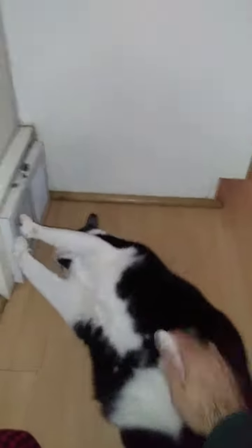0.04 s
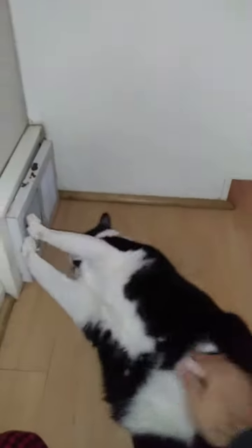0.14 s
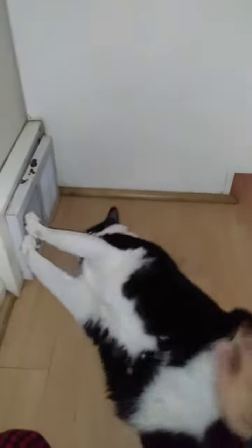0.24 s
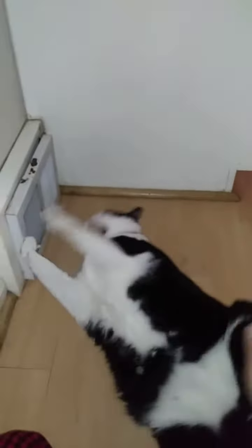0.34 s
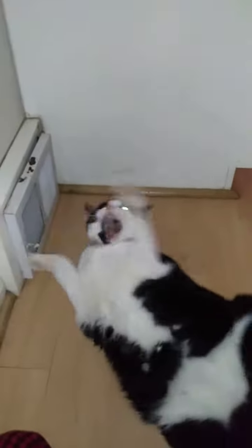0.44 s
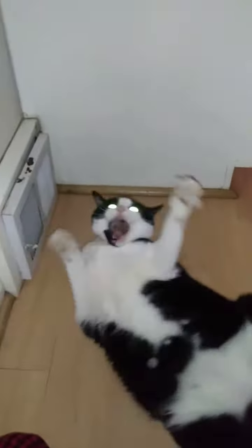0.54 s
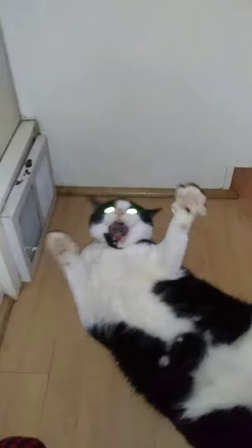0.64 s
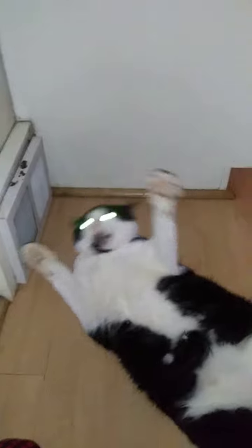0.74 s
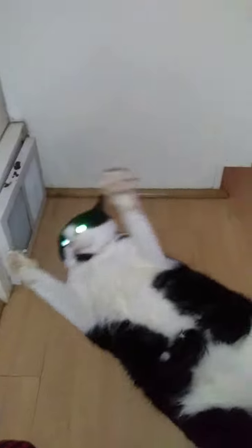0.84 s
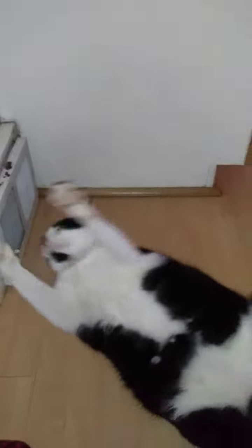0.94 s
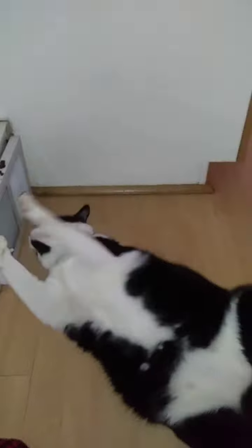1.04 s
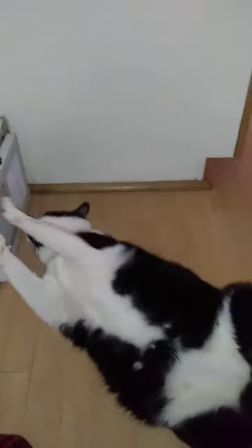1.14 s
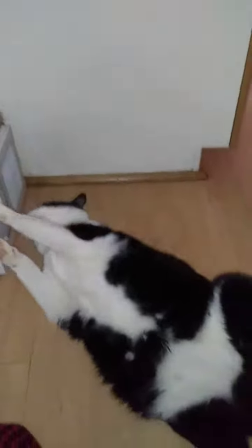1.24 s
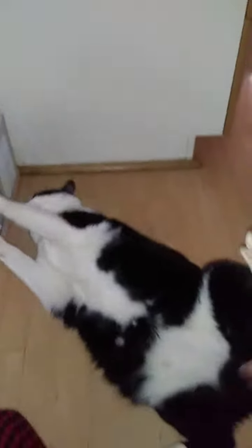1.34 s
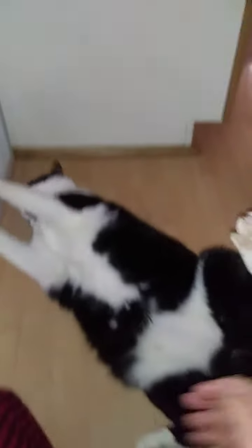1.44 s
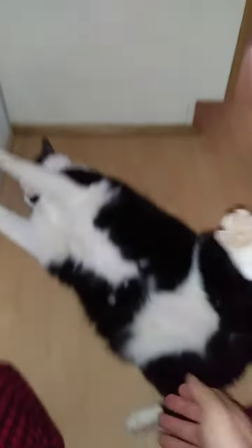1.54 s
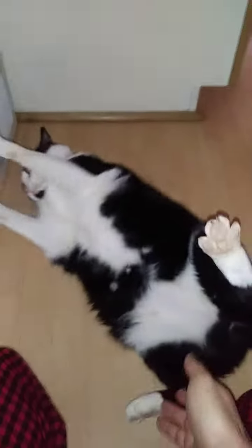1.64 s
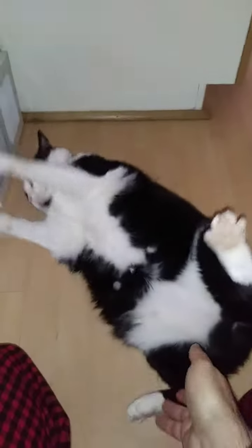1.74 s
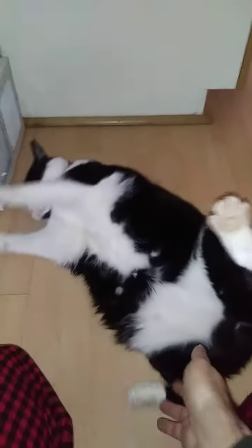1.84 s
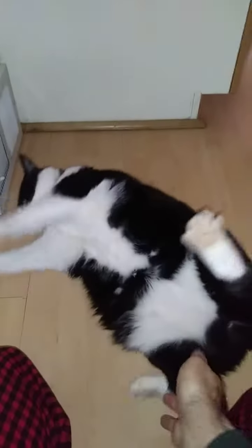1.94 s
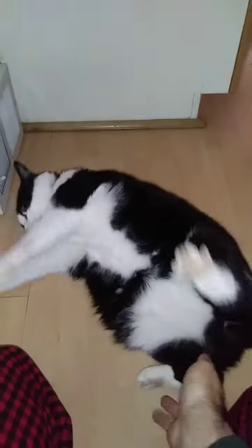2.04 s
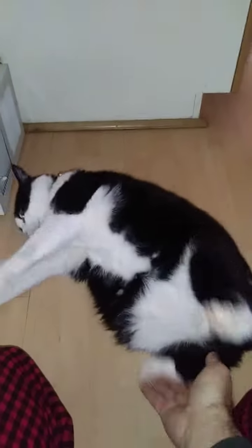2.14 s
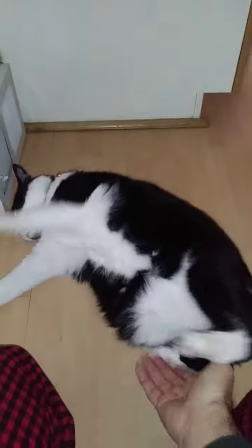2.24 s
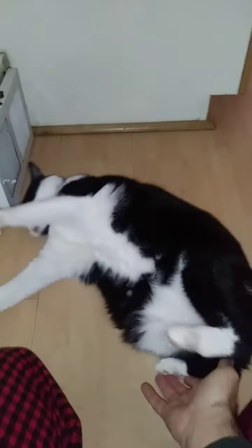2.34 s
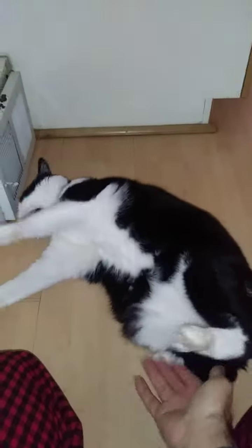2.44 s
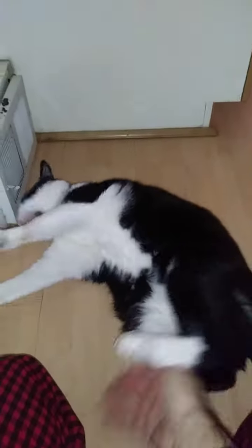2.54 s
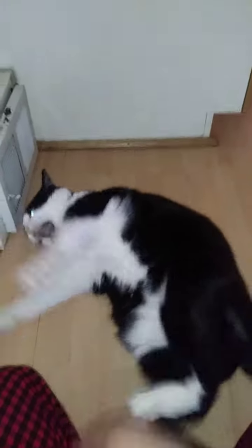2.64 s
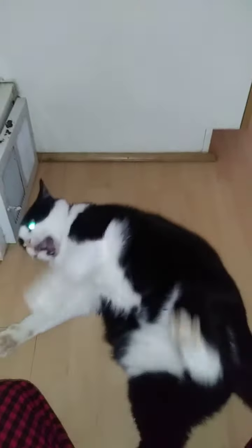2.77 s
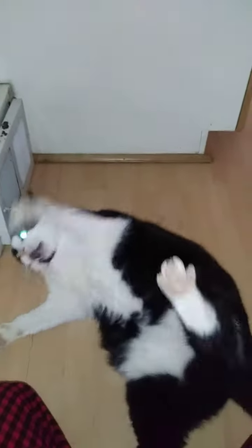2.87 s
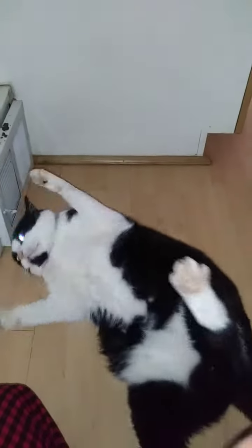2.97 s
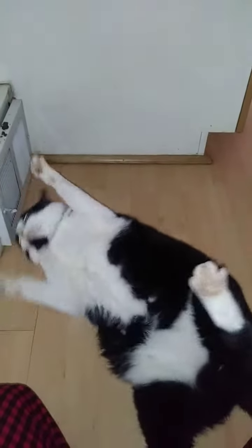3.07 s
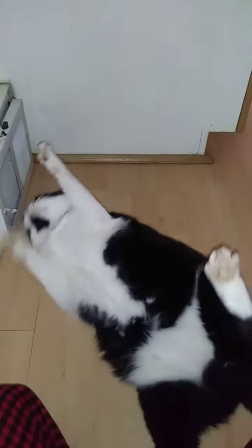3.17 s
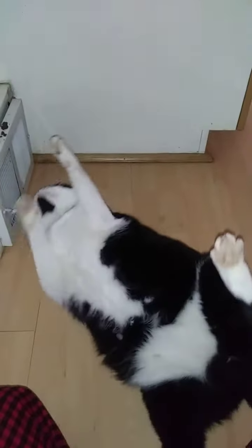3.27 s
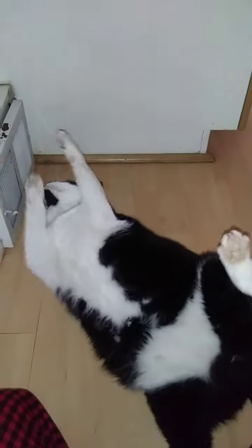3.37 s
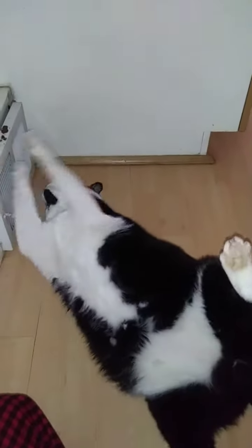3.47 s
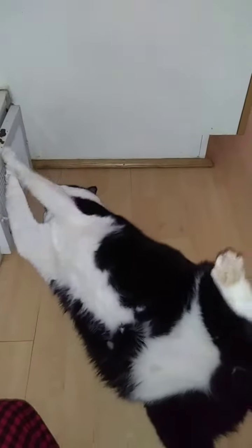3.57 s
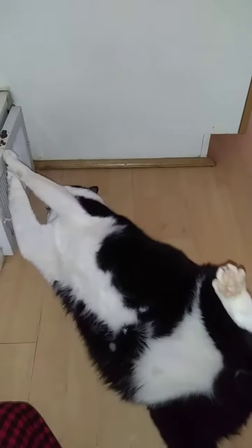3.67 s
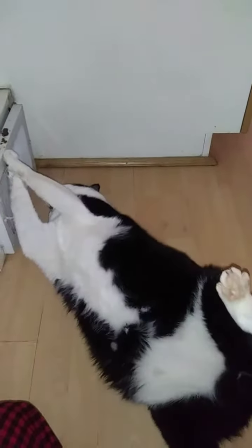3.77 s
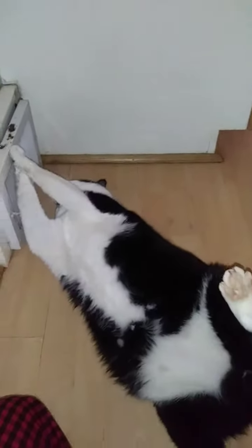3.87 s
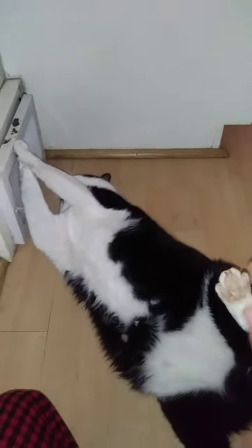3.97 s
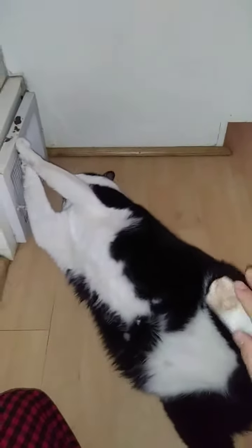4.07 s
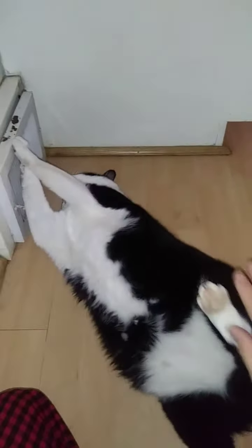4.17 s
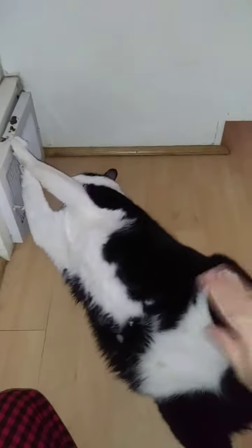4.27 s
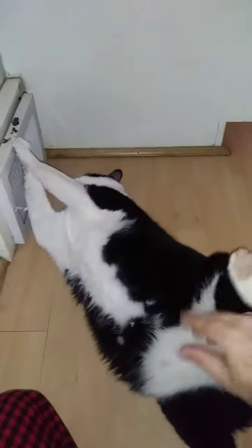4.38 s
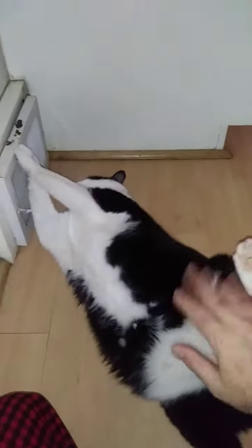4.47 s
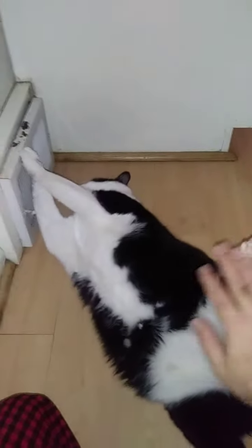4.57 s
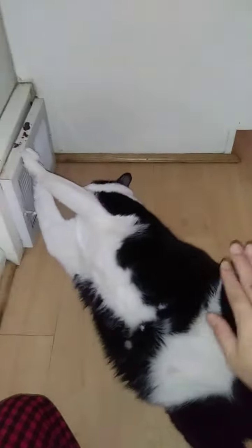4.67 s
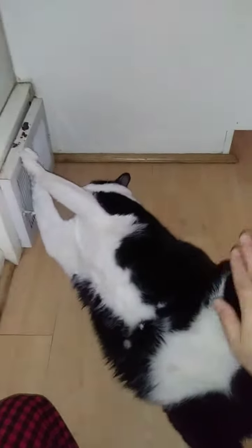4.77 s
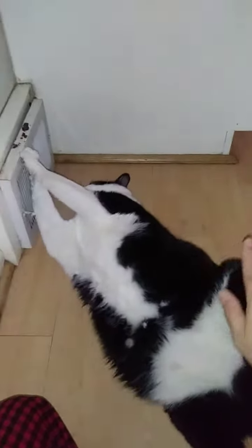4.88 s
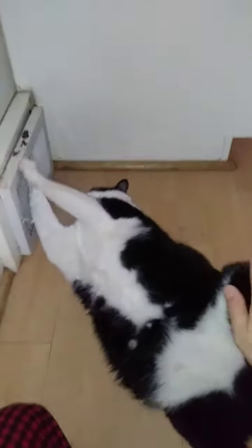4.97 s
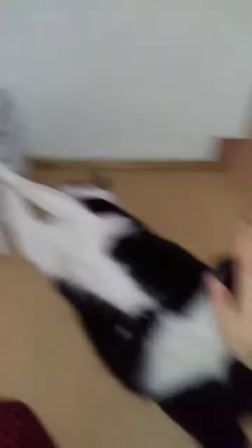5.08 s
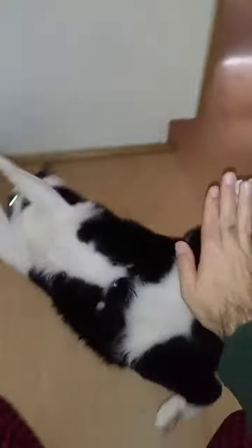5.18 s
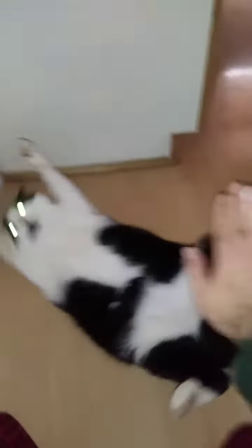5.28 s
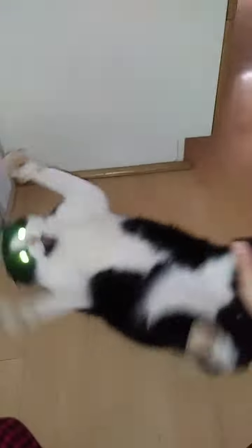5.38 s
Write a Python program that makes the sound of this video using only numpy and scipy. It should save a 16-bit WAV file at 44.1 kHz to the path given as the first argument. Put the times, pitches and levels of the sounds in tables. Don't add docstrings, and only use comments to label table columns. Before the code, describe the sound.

Close indoor cat meows, first raspy then clear, the second led in by a trill, amid small ticks, fur rustle and steady low hum.

```python
import sys
import numpy as np
from scipy import signal
from scipy.io import wavfile
from scipy.ndimage import uniform_filter1d

SR = 44100
rng = np.random.default_rng(int(sys.argv[2]) if len(sys.argv) > 2 else 0)


def voltage_ratio(level):
    return 10 ** (np.asarray(level, float) / 20)


def generate_wav(signal):
    frames = np.transpose(np.atleast_2d(signal))
    scaled = np.clip(frames, -1, 1) * 32767
    pcm = np.round(scaled).astype(np.int16)
    wavfile.write(sys.argv[1], SR, pcm)


N = 238713


def cat_calls(near):
    # t/s, effort/dB, jaw opening [0-1], lips drawn back [0-1]
    first = [(0.269, -54, 0.66, 0.53), (0.318, -34.5, 0.37, 0.36), (.34, -35.5, .45, .85),
             (.44, -35, 0.73, 0.75), (.51, -36.5, 0.78, 0.63), (.588, -28.5, 0.43, 0.3),
             (.624, -23, 0.33, 0.07), (0.741, -25.5, 0, 1), (0.787, -63, 0.83, 0.3)]
    trill = [(2.17, -79, 0.88, 0.19), (2.27, -76, 0.52, .4), (2.346, -55, 0.12, .6),
             (2.396, -34.5, 0.2, 0.58)]
    second = [(2.434, -32, 0.56, 0.63), (2.51, -40, 0.78, 0.88), (2.54, -32, 0.73, 0.93),
              (2.606, -39, 0.84, 0.71), (2.658, -30.5, 0.75, 0.79), (2.732, -29, 0.53, 0.76),
              (2.83, -30.5, 0.46, 0.037), (2.889, -36.5, 0.19, 0.12), (2.94, -91, 0.44, 0.04)]
    third = [(5.373, -53, 0.18, .05), (5.394, -42.5, 0.35, 0.25), (5.42, -34, .6, 0.22)]
    # t/s, weakness of every second pulse [0-1], roughness [0-1]
    folds = [
        [(.29, 0, 1), (.315, .3, .2), (.35, 1, .22), (.42, 1, .35), (.52, .9, .34), (.57, .03, .05),
         (.74, 0, .05), (.76, 0, .6)],
        [(2.33, .6, .72), (2.4, .8, .4), (2.52, .8, .6), (2.545, .9, .12), (2.6, .9, .4), (2.64, .9, .1),
         (2.74, .9, .13), (2.785, .03, .05), (2.87, 0, .08)],
        [(5.3, .9, .65)],
    ]
    steady_s = (.53, 2.76, 9)
    facing_db = (-7.5, -2.5, -17)
    nasal_db = (-3.5, 1, 1)
    cheek_db = (-4, 1.5, -8)
    for call in zip((first, trill + second, third), folds, steady_s, facing_db, nasal_db, cheek_db):
        add(near, *meow(*call))


def meow(gestures, fold_states, steady_s, facing_db, nasal_db, cheek_db):
    # t/s, f/Hz
    pitch = [
        [(.27, 499), (.29, 506.4), (.348, 609), (.424, 683.7), (.452, 669), (.514, 712.4), (.596, 721.7),
         (.7, 623.5), (.77, 589)],
        [(2.17, 369), (2.26, 371.3), (2.31, 377.4), (2.335, 442.2), (2.375, 456.5)],
        [(2.445, 607), (2.5, 590.6), (2.535, 644.7), (2.61, 653.3), (2.65, 666.6), (2.76, 654.4), (2.834, 609),
         (2.88, 608), (2.94, 460.7)],
        [(5.377, 420), (5.42, 465)],
    ]
    # middle t/s, length/s, level/dB
    hums = [
        (.31, 0.15, -45.5),
        (2.26, 0.25, -35.5),
        (2.39, 0.16, -38),
        (2.905, 0.053, -33),
    ]
    widths_hz = (240, 432, 420, 734, 1080)
    # rides on mouth (0) or teeth (1), f/Hz, width/Hz, level/dB
    side_cavities = [(0, 3200, 700, -13), (1, 7400, 900, -5), (1, 9200, 1400, -15), (1, 11000, 2200, -13),
                     (1, 15000, 2500, -12)]

    s, *columns = np.transpose(gestures)
    t = np.arange(s[0], s[-1], 1 / SR)
    throat_db, jaw, lips = (np.interp(t, s, c) for c in columns)
    s, *columns = np.transpose(fold_states)
    weak, rough = (np.interp(t, s, c) for c in columns)
    steady = np.clip((t - steady_s) / 0.039, 0, 1)

    from_tremor = t - 2.7
    quaver = np.exp(-(from_tremor / 0.078) ** 4) * np.cos(2 * np.pi * 15.6 * from_tremor)
    hz = np.interp(t, *np.transpose(sum(pitch, []))) + 18.2 * quaver

    nose_hz = between((1100, 2 * hz), steady)
    throat_hz = between((between((1770, 2345), lips), 3 * hz), steady)
    mouth_hz = between((between((2900, 4530), lips), 5 * hz), steady)
    teeth_hz = between((between((4540, 7230), jaw), 10 * hz), steady)

    part_db = 0.47 * (throat_db + 36)
    low_db = 20 * np.log10(voltage_ratio(-49.5 + 1.5 * jaw + part_db) + swells(hums, t))
    nose_open_db = 5.5 * (hz - 650) / 100 * (1 - steady)
    nose_db = nasal_db - 47.5 + nose_open_db + 1.5 * steady + part_db
    mouth_db = throat_db + between((-23, 16.5), jaw) + cheek_db
    teeth_db = throat_db + between((-36, 6.5), jaw) + 11.5 * lips + steady

    folds, puffs = fold_pulses(hz, weak, rough, steady)
    levels_db = (low_db, nose_db, throat_db, mouth_db, teeth_db)
    centres_hz = (hz, nose_hz, throat_hz, mouth_hz, teeth_hz)
    cavities = list(zip(centres_hz, widths_hz, levels_db, (.45, .6, .7, 1.1, 1.2)))
    for on_teeth, f, width, db in side_cavities:
        cavities.append((f, width, levels_db[3 + int(on_teeth)] + db + on_teeth * facing_db, .75))

    out = np.zeros(len(t))
    for k, (centre_hz, width_hz, db, airy) in enumerate(cavities):
        share = np.clip(airy * rough, 0, 1)
        band = resonate((1 - share) * folds + share * puffs, centre_hz, width_hz)
        band = resonate(band, centre_hz, 1.56 * width_hz)
        if k == 2:
            band = weak * band + 0.5 * (1 - weak) * resonate(band, centre_hz, 380)
        evenness = np.sqrt(abs(uniform_filter1d(band ** 2, size=1500)) + 1e-9)
        out += (-1) ** k * voltage_ratio(db) * band / evenness

    trilling = (t > 2) * np.clip((2.35 - t) / .03, 0, 1)
    flutter = 1 + 0.57 * trilling * np.cos(2 * np.pi * 31 * (t - 2.256))
    return t[0], out * flutter * signal.windows.tukey(len(t), .04)


def fold_pulses(hz, weak, rough, steady):
    n = len(hz)
    jitter = uniform_filter1d(uniform_filter1d(rng.standard_normal(n), size=200), size=200)
    cycle_jitter = uniform_filter1d(rng.standard_normal(n), size=70)
    jitter = evened(jitter) + 0.98 * evened(cycle_jitter)
    pairs = np.cumsum(hz * (1 + 0.0301 * rough * jitter)) / (2 * SR)
    calm = np.clip(.55 - 2 * rough + .35 * steady, 0, 1)
    each_pulse = np.exp(-(2 * pairs % 1) / .3)
    each_pair = np.exp(-(pairs % 1) / .4)
    gate = (1 - weak) * each_pulse + weak * each_pair
    puffs = evened((0.14 + gate) * rng.standard_normal(n))
    folds = partials(pairs, 2, calm) + weak * partials(pairs, 1, 0.22 * calm)
    return folds, puffs


def partials(pairs, first, calm):
    out = 0
    for k in range(first, 49, 2):
        wander = np.interp(np.arange(len(pairs)) / 1300, np.arange(40), rng.standard_normal(40))
        uneven_db = 5 * (1 - calm) * min(k / 6, 1) * wander
        lag_rad = 0.95 * rng.standard_normal()
        out = out + voltage_ratio(uneven_db) * np.cos(2 * np.pi * k * pairs + lag_rad)
    return evened(out)


def claws_on_door(near):
    # t/s, peak/dB, scrape length/s
    pings = [
        (0.268, -28.5, 0.018),
        (0.989, -32.5, 0.028),
        (1.177, -35, 0.031),
    ]
    # t/s, peak/dB, scrape length/s
    clangs = [
        (4.5131, -37, 0.0022),
    ]
    # f/Hz, level/dB, t60/s
    wire = [(2125, 2, 0.069), (3790, 5.5, 0.11), (4700, -13, 0.1), (5800, 7, 0.07), (7100, 10, 0.047),
            (8160, -14, .04), (8900, -2, .05), (9200, -11, 0.038), (10200, -1, 0.036)]
    # f/Hz, level/dB, t60/s
    latch = [(1970, 14, 0.35), (2060, 1, 1), (2960, -3, 0.95), (4420, 9.5, 0.28), (5400, 7, 0.12),
             (6530, 3, 0.25), (8520, 2, 0.18), (10640, -6, .1)]
    for events, modes in ((pings, wire), (clangs, latch)):
        for s, db, scrape_s in events:
            add(near, s, ring(db, scrape_s, modes))


def ring(db, scrape_s, modes):
    t = np.arange(20000) / SR
    body = np.zeros(len(t))
    for hz, mode_db, t60 in modes:
        phase = 2 * np.pi * (hz * rng.normal(1, 0.0024) * t + rng.random())
        body += voltage_ratio(mode_db - 60 * t / t60) * np.sin(phase)
    scrape = rng.standard_normal(len(t)) * np.exp(-t / scrape_s)
    swell = 1 - np.exp(-t / (0.22 * scrape_s))
    return voltage_ratio(db) * (swell * body / abs(body).max() + 0.28 * resonate(scrape, 4800, 5000))


def paws_and_pats(near):
    # t/s, peak/dB, f/Hz, t60/s
    ticks = [(.241, -46, 3700, 0.017), (.269, -36, 7400, .03), (1.398, -42.5, 2500, 0.017),
             (1.419, -40, 5000, 0.0075), (1.432, -35, 1100, .03), (1.84, -48, 6000, .03),
             (2.05, -38, 4840, 0.063), (2.867, -33, 6610, 0.052), (3.117, -41.5, 3300, 0.012),
             (3.178, -44.5, 2490, 0.038), (3.311, -45, 2470, 0.016), (4.158, -44, 4600, .03),
             (4.571, -32.5, 8900, .022), (5.002, -43, 3500, 0.017), (5.165, -58, 5500, .02)]
    # t/s, peak/dB, f/Hz,
    # t60/s
    clucks = [(.755, -33.5, 1913, 0.044), (.775, -37.5, 2210, .14), (1.186, -41, 5200, .029),
              (2.064, -35.5, 3150, .057), (2.597, -14, 5800, .01), (2.9, -37, 5700, 0.062),
              (4.58, -45, 4000, 0.092), (5.3663, -35, 5900, .015)]
    # t/s, peak/dB, f/Hz, t60/s
    chinks = [
        (2.895, -39, 2630, .07),
        (4.585, -50, 8400, .1),
        (4.949, -53, 6800, .12),
        (5.026, -51, 2770, .06),
    ]
    # t/s, peak/dB
    thumps = [
        (1.301, -34),
        (1.369, -30),
        (4.868, -46),
        (5.227, -36),
    ]
    for events, width in ((ticks, 0.99), (clucks, 0.27), (chinks, .07)):
        for s, db, hz, t60 in events:
            add(near, s, tick(db, hz, width * hz, t60))
    for s, db in thumps:
        add(near, s, tick(db, hz=215, width_hz=370, t60=0.036))


def tick(db, hz, width_hz, t60):
    t = np.arange(5000) / SR
    puff = rng.standard_normal(len(t)) * voltage_ratio(-60 * t / t60) * np.minimum(t / 0.0022, 1)
    puff = resonate(resonate(puff, hz, width_hz), hz, width_hz)
    return voltage_ratio(db) * puff / abs(puff).max()


def room(x):
    taps = np.zeros(SR // 2)
    at = np.arange(200, len(taps) - 20, 20)
    near_walls = voltage_ratio(-60 * at / SR / 0.29)
    flat = voltage_ratio(-15 - 60 * at / SR / .8)
    signs = rng.choice([-1., 1.], len(at))
    taps[at + rng.integers(0, 20, len(at))] = signs * (near_walls + flat)
    return signal.fftconvolve(x, taps / np.linalg.norm(taps))[:N]


def slide():
    # f/Hz, level/dB per Hz
    fur = [(880, -43), (1500, 8.5), (1590, -15.5), (1740, 5), (2900, -6.5), (3820, 1.5), (4840, -0.5),
           (6310, -1.5), (12600, -21), (15800, -37)]
    # middle t/s, length/s, level/dB
    strokes = [(.55, 0.75, -47), (1.72, 1.0, -57.5), (2.09, 0.29, -55), (2.6, 1.0, -53), (4.15, 0.47, -64),
               (4.46, 0.18, -65.5), (4.59, 0.14, -57.5), (4.99, 0.16, -55.5), (5.16, 0.075, -67),
               (5.42, 0.25, -57.5)]
    rest_db = -65.5
    grain = uniform_filter1d(voltage_ratio(4.6 * rng.exponential(1, N)), size=90)
    hiss = noise(fur, patchy_db=1.5)
    return (voltage_ratio(rest_db) + swells(strokes, np.arange(N) / SR)) * evened(hiss * grain)


def appliance():
    # f/Hz, level/dB
    drone = [(26, -44), (45, -29.5), (101, -1), (139, -14), (221, 0.5), (283, -5), (485, -12), (548, -10.5),
             (635, -13.5), (736, -22.5), (1090, -23), (3280, -36.5), (6840, -45.5), (15800, -59.5)]
    drone_db, buzz_db = -42, -74
    buzz_per_s, buzz_hz, buzz_width_hz = 59.9, 6500, 2200
    cycle = np.arange(N) * buzz_per_s / SR % 1
    snap = 14.0 * (np.diff(cycle, prepend=0) < 0)
    spark = snap + np.exp(-cycle / 0.016) * rng.standard_normal(N)
    buzz = resonate(resonate(spark, buzz_hz, buzz_width_hz), buzz_hz, buzz_width_hz)
    return voltage_ratio(drone_db) * noise(drone, patchy_db=1.04) + voltage_ratio(buzz_db) * evened(buzz)


def noise(spectrum, patchy_db):
    frames, hz = N // 256 + 5, np.fft.rfftfreq(1024, 1 / SR)
    a, b, patches = rng.standard_normal((frames, 513, 3)).T
    patches = evened(uniform_filter1d(uniform_filter1d(patches, size=8, axis=0), size=12, axis=1))
    f, db = np.transpose(spectrum)
    shape_db = np.interp(np.log(hz + 1), np.log(f + 1), db)[:, None]
    bins = (a + 1j * b) * voltage_ratio(shape_db + patchy_db * patches)
    return evened(signal.istft(bins, nperseg=1024, noverlap=768)[1][:N])


def resonate(x, hz, width_hz):
    turn = np.exp(2j * np.pi * np.cumsum(hz * np.ones(len(x))) / SR)
    r = np.exp(-np.pi * width_hz / SR)
    return 2 * (turn * signal.lfilter([1 - r], [1, -r], x / turn + 1e-18)).real


def swells(rows, t):
    return sum(voltage_ratio(db) * np.cos(np.pi * np.clip((t - s) / length, -.5, .5)) ** 2 for s, length, db in rows)


def between(ends, share):
    return ends[0] + (ends[1] - ends[0]) * share


def evened(x):
    return x / np.sqrt(np.mean(x ** 2) + 1e-20)


def add(mix, s, sound):
    part = mix[round(s * SR):][:len(sound)]
    part += sound[:len(part)]


def scene():
    near = np.zeros(N)
    cat_calls(near)
    claws_on_door(near)
    paws_and_pats(near)
    near = signal.sosfilt(signal.butter(3, 8080, fs=SR, output="sos"), near)
    wet_db = -11.5 + np.interp(np.arange(N) / SR, (1, 2), (-3, 1))
    return (near + room(near * voltage_ratio(wet_db)) + slide() + appliance())[None]


def roll_off(x):
    return signal.sosfilt(signal.butter(12, 15900, fs=SR, output="sos"), x)


def record(dry):
    port_hz, port_width_hz, hiss_db, low_cut_hz = 15000, 1600, -81.5, 61
    hiss = resonate(rng.standard_normal(N), port_hz, port_width_hz)
    hiss = evened(resonate(hiss, port_hz, port_width_hz))
    low_cut = signal.butter(4, low_cut_hz, "high", fs=SR, output="sos")
    heard = signal.sosfilt(low_cut, dry + voltage_ratio(hiss_db) * hiss)
    return roll_off(heard)


dry = scene()
out = record(dry)
generate_wav(out)
```